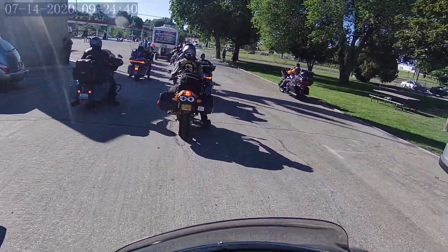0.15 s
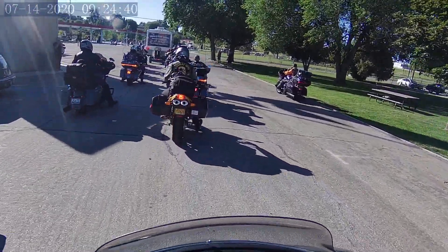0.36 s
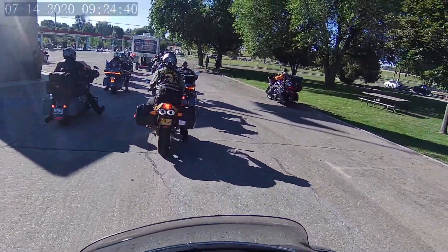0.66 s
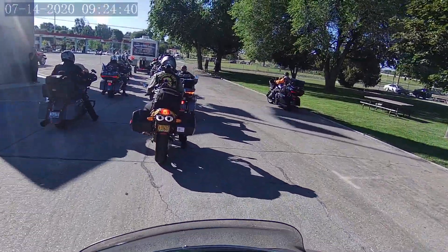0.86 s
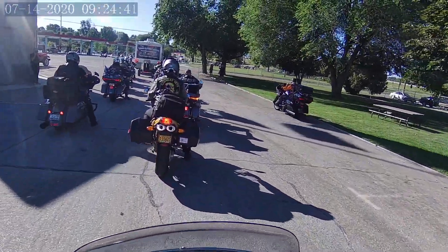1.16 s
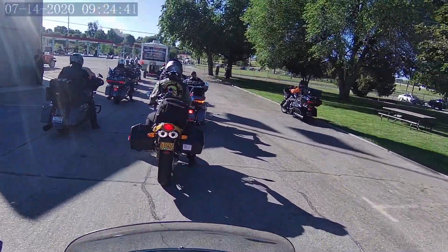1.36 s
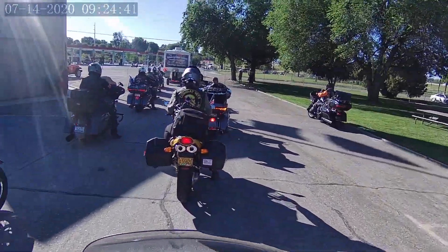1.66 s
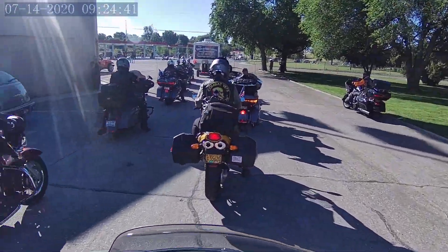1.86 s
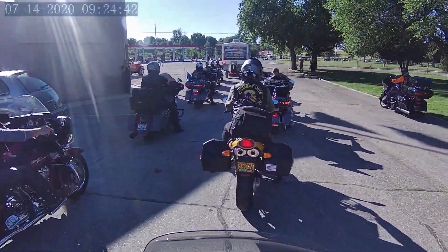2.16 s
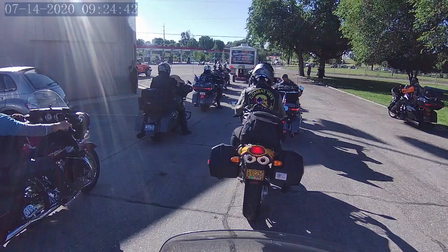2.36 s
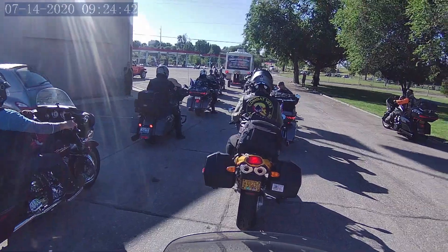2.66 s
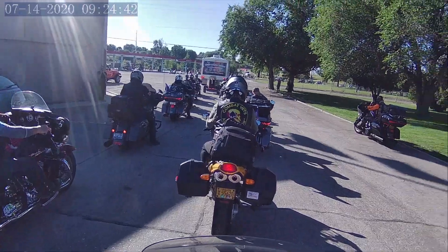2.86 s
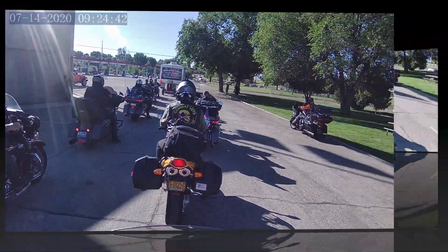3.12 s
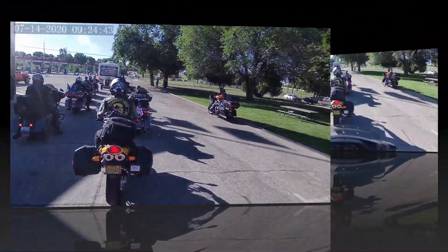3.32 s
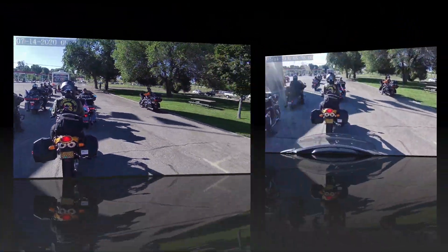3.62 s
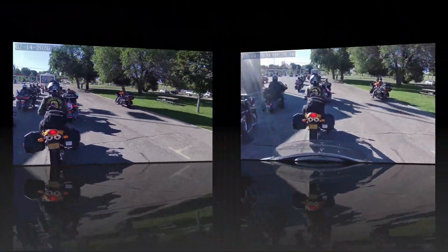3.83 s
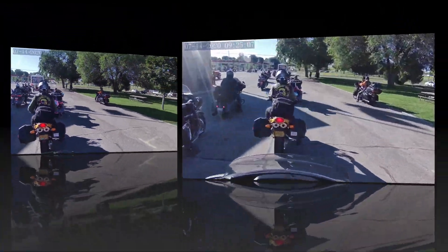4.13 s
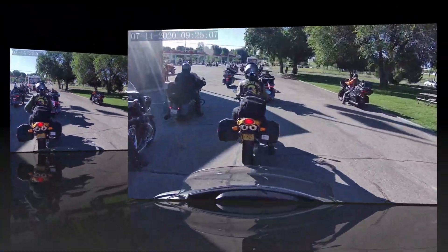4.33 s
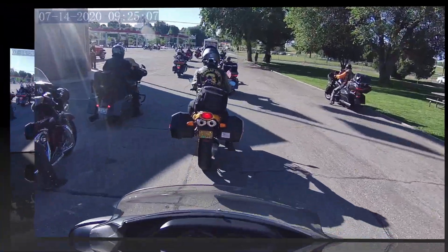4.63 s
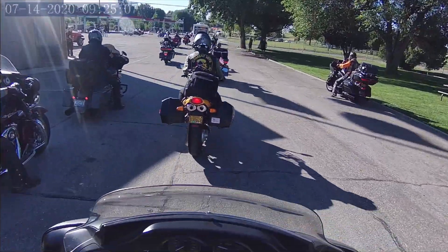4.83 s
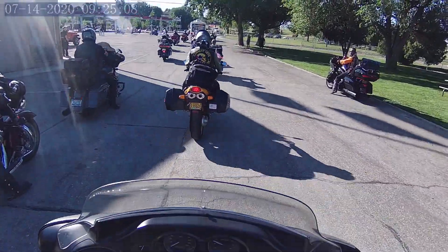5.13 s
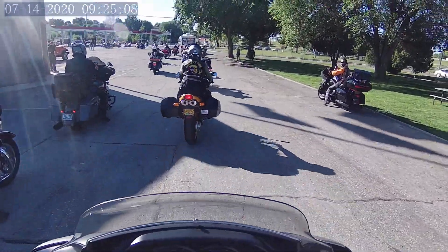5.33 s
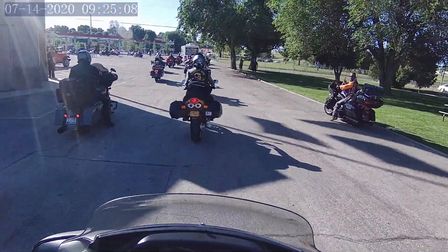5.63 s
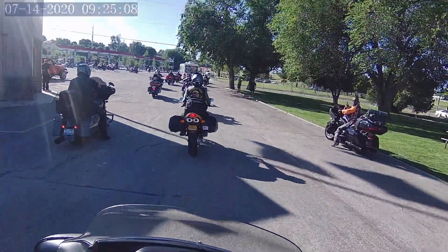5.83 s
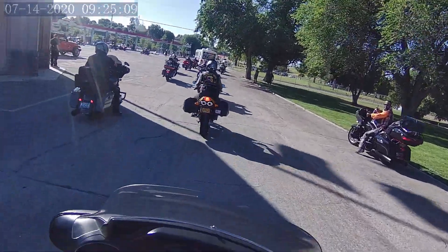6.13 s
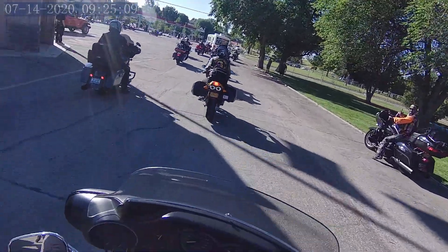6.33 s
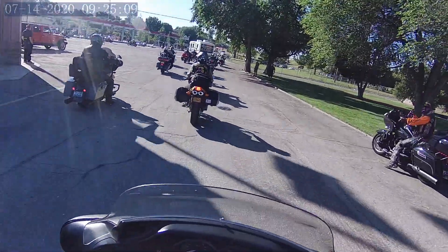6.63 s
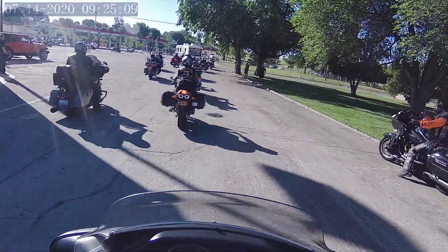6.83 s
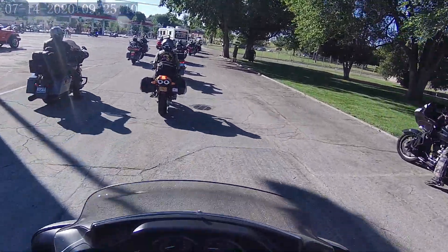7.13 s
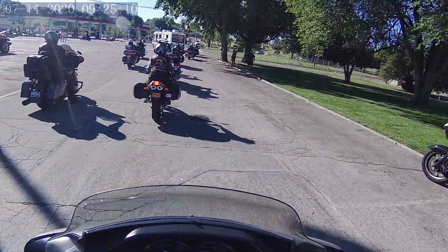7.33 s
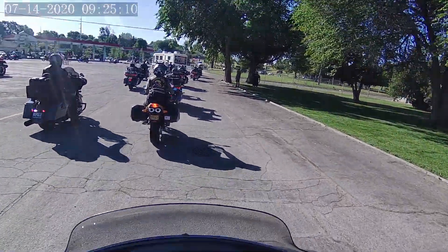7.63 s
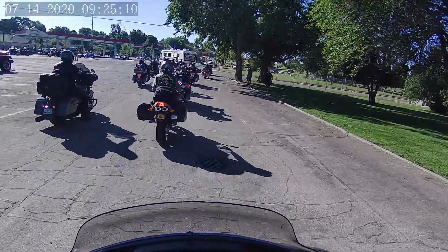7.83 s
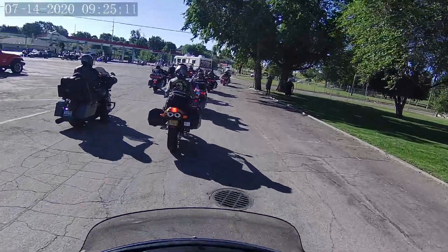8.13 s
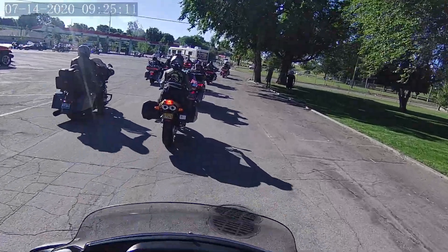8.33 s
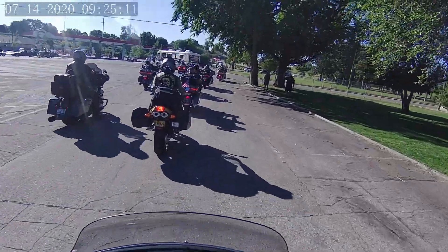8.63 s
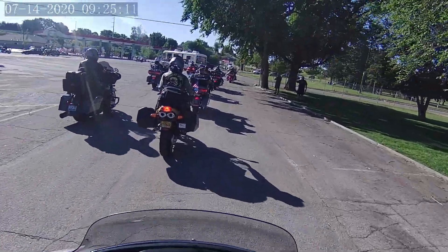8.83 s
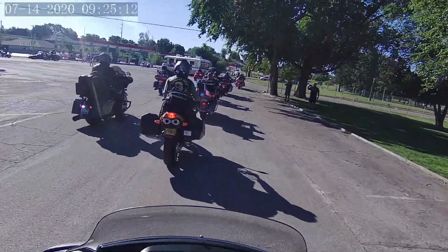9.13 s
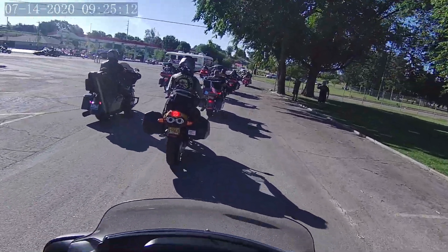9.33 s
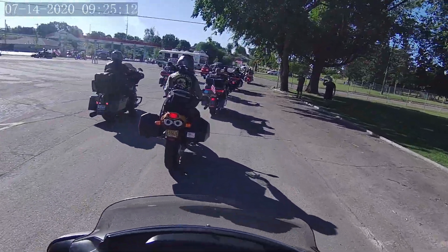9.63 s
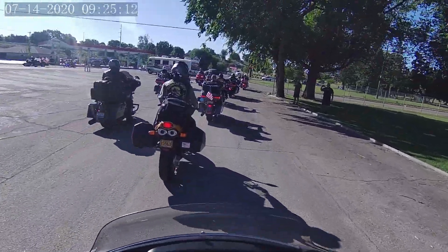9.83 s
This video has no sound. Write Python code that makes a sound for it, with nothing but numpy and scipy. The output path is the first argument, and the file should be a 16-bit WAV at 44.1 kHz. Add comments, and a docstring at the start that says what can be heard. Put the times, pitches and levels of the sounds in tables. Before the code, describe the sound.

A group of V-twin motorcycles idles outdoors in a parking lot, heard from one of the bikes: a low, uneven rumble with light valve ticks. The nearest throttle is blipped several times, barking and popping, while other bikes drone and the whole pack grows much louder. The near engine lugs in heavy thumps as it pulls away, the bike jolts over rough paving, and the rumble sinks again.

```python
"""A group of V-twin motorcycles idles in a parking lot, then pulls away, heard from one of the bikes.
At first firings boom in the pipes, valves tick and a waiting bike hums, its idle sagging.
From 3.5 s the near throttle is blipped: pressure fronts bark, gas roars and fittings clang.
From 4.5 s open pipes snap and two other bikes drone. At 6.4 s the near engine lugs in heavy thumps.
Near 8 s the bike jolts over rough paving; its engine knocks and settles as the rumble sinks."""
import sys
import numpy as np
from scipy import signal
from scipy.io import wavfile
from scipy.ndimage import uniform_filter1d

SR = 44100
rng = np.random.default_rng(int(sys.argv[2]) if len(sys.argv) > 2 else 0)


def dump(signal):
    """Clip the signal to [-1, 1] and save it as 16-bit WAV at the path in sys.argv[1]."""
    limited = np.clip(np.atleast_2d(signal).T, -1, 1)
    pcm = np.round(limited * 32767).astype(np.int16)
    wavfile.write(sys.argv[1], SR, pcm)


N = 439677
TIME = np.arange(N) / SR


def amp(db):
    return 10 ** (np.asarray(db) / 20)


def unit(x):
    return x / np.sqrt(np.mean(x ** 2) + 1e-20)


def steady(x, size=6000):
    """Holds the running rms at 1, leaving single beats intact."""
    return x / np.sqrt(uniform_filter1d(uniform_filter1d(x ** 2, size), size) + 1e-12)


def curves(rows):
    """One curve per column after t/s."""
    times_s, *columns = np.transpose(rows)
    return [np.interp(TIME, times_s, column) for column in columns]


def add(mix, at_s, sound):
    part = mix[max(round(at_s * SR), 0):][:len(sound)]
    part += sound[:len(part)]


def wander(rate_hz):
    """Random drift, rms 1."""
    knots_s = np.arange(0, TIME[-1] + 1, 1 / rate_hz)
    return unit(np.interp(TIME, knots_s, rng.standard_normal(2048)[:len(knots_s)]))


def hump(t, peak_s):
    """Rises to 1 at peak_s, then decays."""
    return t / peak_s * np.exp(1 - t / peak_s)


def onset(t, rise_s):
    return 1 - np.exp(-(t / rise_s) ** 2)


def gate(rows, edge_s):
    """Ramps in after the first row, out before the last."""
    return np.clip(np.minimum(TIME - rows[0][0], rows[-1][0] - TIME) / edge_s, 0, 1)


def spell_db(start_s, hold_s, rise_db_per_s, fall_db_per_s):
    """Attack, hold at 0 dB, release."""
    early_s, late_s = np.maximum(start_s - TIME, 0), np.maximum(TIME - start_s - hold_s, 0)
    return -rise_db_per_s * early_s - fall_db_per_s * late_s


def fade(x, tail_s):
    """Exponential tail on every pulse."""
    return signal.lfilter([1], [1, -np.exp(-1 / (tail_s * SR))], x)


def colour(x, spectrum, size=8192):
    """Minimum-phase filter from rows of f/Hz, level/dB."""
    hz, db = np.transpose(spectrum)
    bins_hz = abs(np.fft.fftfreq(size, 1 / SR)) + 1
    log_gain = np.log(amp(np.interp(np.log(bins_hz), np.log(hz), db)))
    taps = np.fft.ifft(np.exp(np.conj(signal.hilbert(log_gain)))).real[:size // 2]
    return signal.oaconvolve(x, taps)[:len(x)]


def burst(envelope, spectrum, ripple_db=4):
    """Noise puff ringing resonances in random proportions; strongest rms 1."""
    varied = [(hz, db + ripple_db * rng.standard_normal()) for hz, db in spectrum]
    puff = colour(envelope * rng.standard_normal(len(envelope)), varied, size=2048)
    return puff / np.sqrt(uniform_filter1d(puff ** 2, size=110).max())


def turbulence(depth_db):
    """Noise in which patches about 10 ms by 700 Hz come and go."""
    bins = signal.stft(rng.standard_normal(N), nperseg=256)[2]
    patches = uniform_filter1d(rng.standard_normal(bins.shape), size=4, axis=0)
    patches = uniform_filter1d(patches, size=4, axis=1)
    return signal.istft(bins * amp(depth_db * unit(patches)))[1][:N]


def reflections(x, span_s, wet_db, count=24):
    """Scattered echoes off ground, wall and other bikes."""
    delay, sign = rng.uniform(.04, 1, count), rng.choice([-1, 1], count)
    taps = np.zeros(SR // 2)
    taps[(delay * span_s * SR).astype(int)] = sign * np.exp(-2 * delay)
    return x + amp(wet_db) * signal.oaconvolve(x, taps / np.linalg.norm(taps))[:N]


def strokes(cycles, uneven_db, rear_db):
    """A 45-degree V-twin fires twice a cycle, 315 and 405 degrees apart, never twice alike."""
    out = np.zeros(N)
    for lag, db in ((0, 0), (315 / 720, rear_db)):
        at = np.flatnonzero(np.diff(np.floor(cycles - lag)))
        out[at] = amp(db + uneven_db * rng.standard_normal(512)[:len(at)].clip(-2, 2))
    return out


def pack_firings(cycle_hz, uneven_db, jitter=0.008085):
    """Another bike's firings: random crank phase, slightly unsteady speed."""
    cycles = np.cumsum(cycle_hz * (1 + jitter * wander(12))) / SR + rng.random()
    return strokes(cycles, uneven_db, rear_db=-2)


# other engines, idle cycle rates: f/Hz
PACK_IDLE_HZ = [12.6, 14.8, 16.3, 19.1]
# chain and tappet spectrum: f/Hz, level/dB
CHATTER_SPECTRUM = [(400, -12.5), (700, 1.5), (950, 8), (1350, 3.5), (1700, -4.5), (2100, -6.5),
                    (2600, -24), (3000, -16), (3450, -22.5), (4000, -10), (4500, -6), (5200, -17.5),
                    (6200, -19.5), (7300, -31), (9000, -20.5), (11000, -45.5)]
def chatter(level_db=-71):
    """Chains and tappets of the other engines clatter unevenly."""
    beats = sum(pack_firings(hz, uneven_db=3, jitter=0.027) for hz in PACK_IDLE_HZ)
    clatter = fade(beats, tail_s=.004) * turbulence(depth_db=4.5)
    return amp(level_db) * unit(colour(clatter, CHATTER_SPECTRUM))


# gear tone: t/s, f/Hz, level/dB
GEAR_TONE = [(.9, 675, -61), (1.15, 695, -63.5), (1.45, 710, -62.5), (1.819, 699, -64)]
def gear_whine(flutter=0.0085, waver_db=3):
    """Gears of an idling bike give a thin, nearly pure tone."""
    hz, db = curves(GEAR_TONE)
    gain = gate(GEAR_TONE, edge_s=.08) * amp(db + waver_db * wander(25))
    cycles = np.cumsum(hz * (1 + flutter * wander(59.7))) / SR
    return gain * np.sin(2 * np.pi * cycles)


# hollow whines: t/s, hold/s, level/dB
AIR_WHINES = [(7.02, 0.13, -51.5), (7.806, 0.062, -46.5), (8.32, 0.065, -59)]
# air resonance: f/Hz, level/dB
WHINE_SPECTRUM = [(300, -43), (560, -8), (680, -3.5), (820, -16.5), (1800, -55.5), (6000, -110)]
def air_whine(rise_db_per_s=120, fall_db_per_s=60):
    """Moving air sings in one narrow resonance."""
    spells = [db + spell_db(at_s, hold_s, rise_db_per_s, fall_db_per_s)
              for at_s, hold_s, db in AIR_WHINES]
    return amp(np.max(spells, 0)) * steady(colour(rng.standard_normal(N), WHINE_SPECTRUM))


# sagging idle: t/s, cycle rate/Hz, level/dB
WAITING_IDLE = [(0, 14.05, -40), (.55, 13.9, -42.5), (1.15, 14.15, -43), (1.75, 13.95, -41.5),
                (2.0, 13.3, -42.5), (2.25, 12.4, -42), (2.6, 11.8, -40.5), (3.0, 11.0, -44.5),
                (3.4, 10.6, -42), (3.8, 10.6, -53)]
# exhaust orders: f/cycle rate, level/dB
HUM_ORDERS = [(8, -8), (9, -6.5), (10, -2), (11, -7.5), (12, -1.5), (13, -3), (14, -7.5), (15, 0),
              (16, -10), (18, -7.5), (21, -21.5)]
def waiting_bike(waver_db=2, jitter=0.0038, release_s=0.23):
    """An even idle: exhaust orders stand out as a hum that sinks with the revs."""
    cycle_hz, db = curves(WAITING_IDLE)
    cycles = np.cumsum(cycle_hz * (1 + jitter * wander(18))) / SR
    hum = sum(amp(order_db + waver_db * wander(13)) * np.sin(2 * np.pi * (order * cycles + rng.random()))
              for order, order_db in HUM_ORDERS)
    return amp(db) * np.clip((WAITING_IDLE[-1][0] - TIME) / release_s, 0, 1) * hum


# bike taking up speed, strongest order: t/s, f/Hz, level/dB
LOW_DRONE = [(4.5, 135, -23), (4.62, 126, -16.5), (4.77, 126, -21.5), (4.9, 136, -17), (5.13, 127.5, -15.5),
             (5.35, 125.5, -18.5), (5.85, 124, -15.5), (6.15, 114, -16.5), (6.23, 113, -24.5),
             (6.5, 108, -17.5)]
# higher-revving bike easing off: t/s, f/Hz, level/dB
HIGH_DRONE = [(5.05, 177, -27), (5.3, 176.7, -35), (5.45, 176.6, -20.5), (5.8, 175.8, -18.5),
              (5.95, 165.9, -31.5), (6.1, 159, -55), (6.2, 157, -49)]
# exhaust orders: f/strongest order, level/dB
DRONE_PARTIALS = [(.5, -23), (1, -0.5), (1.5, -9.5), (2, -16), (2.5, -24), (3, -22)]
def drone(rows, side_orders_db=0, lumpy_db=1.5, gain_db=-1):
    """Near-steady revs: exhaust orders form a low note, the strongest wavering least."""
    hz, db = curves(rows)
    cycles = np.cumsum(hz * (1 + 0.0045 * wander(30))) / SR
    note = np.zeros(N)
    for ratio, order_db in DRONE_PARTIALS:
        offset_db = (side_orders_db + 3 * wander(9.9)) * (ratio != 1) + lumpy_db * wander(40)
        note += amp(order_db + offset_db) * np.sin(2 * np.pi * (ratio * cycles + rng.random()))
    return amp(db + gain_db) * gate(rows, edge_s=0.054) * note


# group pulling away, easing off: t/s, boom level/dB, rasp level/dB
EXHAUST_LEVELS = [(0, -39, -53), (1.9, -38.5, -53), (2.9, -40.5, -56), (3.35, -37.5, -49.5),
                  (4.1, -25, -40), (4.4, -22.5, -39.5), (4.85, -20.5, -36.5), (6.25, -22.5, -38.5),
                  (6.42, -28, -42.5), (6.75, -26, -41), (7.3, -28, -47), (7.68, -27, -34), (7.76, -35, -49),
                  (7.95, -28, -53), (8.15, -33, -48.5), (9.1, -36.5, -52.5), (9.97, -37.5, -54)]
# pipe boom at idle, under load, throttles shut: f/Hz, level/dB
IDLE_SPECTRUM = [(20, -54), (35, -35.5), (52, -6.5), (80, -13), (100, -3), (120, 1), (150, 0), (205, -6),
                 (255, -12.5), (330, -20.5), (480, -43), (900, -56.5), (3000, -110)]
LOAD_SPECTRUM = [(20, -38.5), (36, -33), (52, -15), (75, -8), (100, -1), (130, 1.5), (160, 4.5), (200, -2),
                 (250, -6.5), (330, -13.5), (480, -22.5), (900, -65.5), (3000, -110)]
COAST_SPECTRUM = [(20, -48), (35, -30), (55, -10.5), (80, -9.5), (108, 0.5), (135, 1), (170, -5), (208, -3),
                  (255, -18), (330, -24), (480, -42.5), (900, -59.5), (3000, -110)]
# gas puffs: f/Hz, level/dB
RASP_SPECTRUM = [(100, -44.5), (245, -2.5), (300, 9), (360, 2.5), (430, 1.5), (560, 0.5), (700, -3.5),
                 (790, -10.5), (950, -7.5), (1150, -26.5), (1500, -30), (2100, -38.5), (2700, -47),
                 (10000, -82.5)]
def exhausts(near_firings, clap_db, blip_rasp_db=-6, coast_from_s=6.7, coast_over_s=.4):
    """All firings boom in their pipes and drag puffs of turbulent gas along, more on each blip."""
    boom_db, rasp_db = curves(EXHAUST_LEVELS)
    load = np.clip((boom_db + 37) / 15, 0, 1)
    coast = np.clip((TIME - coast_from_s) / coast_over_s, 0, 1)
    revs = 1 + .35 * uniform_filter1d(load, SR // 2)
    others = [pack_firings(hz * revs * (1 + .015 * wander(1.5)), uneven_db=0.5) for hz in PACK_IDLE_HZ]
    pack = unit(sum(reflections(bike, span_s=.06, wet_db=-1.5) for bike in others))
    pulses = unit(reflections(near_firings, span_s=.03, wet_db=2)) + amp(6.5) * pack
    idling = steady(colour(pulses, IDLE_SPECTRUM))
    loaded = steady(colour(pulses, LOAD_SPECTRUM))
    coasting = steady(colour(pulses, COAST_SPECTRUM))
    boom = (1 - coast) * ((1 - load) * idling + load * loaded) + coast * coasting
    puffs = (.2 + fade(near_firings + amp(-6.5) * sum(others), tail_s=0.019)) * rng.standard_normal(N)
    rasp = steady(colour(unit(puffs) + amp(-7) * pulses, RASP_SPECTRUM), size=3500)
    rasp_gain = np.hypot(amp(rasp_db), amp(clap_db + blip_rasp_db))
    return amp(boom_db) * steady(boom, size=2500) + rasp_gain * rasp


# near engine lugging: t/s, hold/s, effort/dB
LUG_SPELLS = [(2.88, 0.078, -30), (3.855, 0.13, -25.5), (6.415, 1, -6.5)]
def chug(cycles, heave_db=2, peak_phase=0.096, surge_db=0.55, lug_surge_db=2.5, full_lug_db=-12):
    """Rumble gain: random surges, plus one heave a cycle while the near engine lugs."""
    efforts_db = [db + spell_db(at_s, hold_s, rise_db_per_s=78, fall_db_per_s=10.5)
                  for at_s, hold_s, db in LUG_SPELLS]
    lug = np.clip(amp(np.max(efforts_db, 0) - full_lug_db), 0, 1)
    heave = lug * np.cos(2 * np.pi * (cycles - peak_phase))
    return amp(heave_db * heave + (surge_db + lug_surge_db * lug) * wander(15))


# gas hiss apart from blips: t/s, level/dB
FLOW_LEVELS = [(0, -76.5), (1, -78.5), (3.05, -74), (3.6, -55.5), (4.1, -61), (4.52, -53), (4.62, -66),
               (4.85, -69.5), (5.12, -73.5), (5.5, -67), (7.2, -68.5), (8.4, -71.5), (9.97, -74.5)]
# gas hiss spectrum: f/Hz, level/dB
HISS_SPECTRUM = [(400, -24.5), (1000, 12), (1450, 5.5), (1950, 5), (2350, 0), (2650, -22), (3050, -7.5),
                 (3400, -14.5), (3900, -1), (4500, 2.5), (5300, -7.5), (6200, -6.5), (7300, -23.5),
                 (8900, -10.5), (11000, -32.5)]
def gas_hiss(near_firings, flow_db, grit_db=3):
    """Moving gas: smooth at idle; gritty, patchy and throbbing with the engine as flow grows."""
    flow = np.clip((flow_db + 76) / 16, 0, 1)
    throb = 1 + 0.9 * flow * fade(near_firings, tail_s=0.049)
    grit = amp(grit_db * flow * wander(150))
    gas = (1 - flow) * rng.standard_normal(N) + flow * turbulence(depth_db=3.5)
    return amp(flow_db) * steady(colour(throb * grit * gas, HISS_SPECTRUM))


# sharp pings in the valve clatter: t/s, level/dB, f/Hz
VALVE_PINGS = [(0.109, -63, 2970), (0.2972, -60, 4640), (0.3247, -62, 4700), (0.514, -59, 4600),
               (0.585, -62, 5000), (0.7312, -74, 2720), (0.802, -78, 2750), (1.0854, -75, 4520),
               (1.1119, -72, 3050), (1.2301, -66, 4330), (1.3014, -61, 2930), (1.6587, -56, 4540),
               (1.731, -50, 4600), (1.802, -61, 3000), (1.8287, -60, 4100), (1.8756, -56, 2940),
               (1.9745, -61, 2980), (2.0216, -58, 3020), (2.1246, -65, 2970), (2.173, -58, 4210),
               (2.249, -56, 4400), (2.4307, -59, 3200), (2.4823, -62, 4300), (2.5605, -46, 4190),
               (2.6668, -62, 3080), (2.7207, -62, 4300), (2.803, -56, 4600), (2.83, -58, 4300),
               (2.884, -54, 3030), (3.0525, -61, 4420), (3.089, -57, 3620), (3.1393, -59, 2970),
               (3.225, -49, 4540), (3.31, -51, 4400), (3.351, -52, 3870), (3.3973, -49, 4250),
               (6.9666, -53, 3840), (7.333, -50, 4020), (8.776, -53, 4130), (9.0342, -57, 4120),
               (9.2976, -60, 3850), (9.665, -48, 4180), (9.855, -55.5, 4100), (9.95, -50, 4160)]
# valve gear modes: f/Hz, level/dB, t60/s
VALVE_RING = [(3000, -2, 0.015), (3890, -1.5, 0.012), (4270, 1, 0.015), (4620, -9, 0.041),
              (5600, -10, 0.031), (8660, -10.5, 0.027), (9600, -12.5, .04)]
def valves(cycles, flow_db, ping_gain_db=1, main_db=12, main_t60_s=0.022, spread=0.033, off_pitch_db=-9):
    """Valves snap shut twice a cycle, harder with more flow; each rings the cylinder head anew."""
    beats = strokes(cycles, uneven_db=3.5, rear_db=-5) * amp(-64 + 0.8 * (flow_db + 71))
    hz, db, t60_s = np.transpose(VALVE_RING)[:, :, None]
    ticks = [(i / SR, beats[i], rng.choice(hz[:4, 0]) * (1 + spread * rng.standard_normal()))
             for i in np.flatnonzero(beats)]
    pings = [(at_s, amp(ping_db + ping_gain_db), pitch_hz) for at_s, ping_db, pitch_hz in VALVE_PINGS]
    out, t = np.zeros(N), np.arange(SR // 25) / SR
    for at_s, peak, pitch_hz in pings + ticks:
        detune, strength, phase = rng.standard_normal((3, 3, len(hz), 1))  # three tones per mode
        off_pitch = np.minimum(abs(np.log2(hz / pitch_hz)) * 4, 1)
        envelopes = amp(db + 5 * strength[0] + off_pitch_db * off_pitch - 60 * t / t60_s)
        modes = envelopes * np.sin(2 * np.pi * (hz * (1 + spread * detune) * t + phase))
        main = amp(main_db - 60 * t / main_t60_s) * np.sin(2 * np.pi * pitch_hz * t)
        ring = (modes.sum((0, 1)) + main) * onset(t, rise_s=0.0014)
        add(out, at_s, peak * ring / abs(ring).max())
    return out


# light chinks, hard clangs: t/s, level/dB, f/Hz
FITTING_CHINKS = [(0.084, -65, 8700), (0.5856, -64, 9380), (0.8021, -59.5, 8980), (1.3004, -63, 9000),
                  (1.4426, -67, 9300), (1.515, -68, 9300), (1.5469, -64, 8840), (1.5868, -60, 9300),
                  (1.659, -64, 9350), (1.731, -65, 9500), (2.3266, -64, 8600), (2.4823, -58, 8800),
                  (2.8848, -59, 9370), (3.1762, -59, 9430), (3.3493, -53, 9620), (3.399, -59, 8500),
                  (3.438, -53, 9600), (7.174, -59.5, 8900), (7.219, -65, 8760), (7.3325, -51, 8840),
                  (8.6862, -67, 9250), (9.1222, -71, 8700), (9.2988, -69, 8700), (9.389, -61, 8800),
                  (9.5721, -61.5, 8700), (9.7607, -57.5, 9000)]
FITTING_CLANGS = [(4.232, -38, 1920), (5.302, -29.5, 1456), (6.1, -20, 1160), (6.299, -23.5, 1400),
                  (6.357, -42, 1350), (6.638, -39, 1860), (6.774, -36, 1940), (7.439, -29.5, 1490),
                  (7.532, -35.5, 4370), (7.569, -41.5, 2550), (7.613, -39, 1790), (7.687, -33.5, 1530)]
def loose_fittings(rows, gain_db, ring_s, spread):
    """Shaken parts ring briefly, each in a close cluster of four tones."""
    out, t = np.zeros(N), np.arange(SR // 20) / SR
    for at_s, db, hz in rows:
        detune, phase = rng.standard_normal((2, 4, 1))
        cluster = np.sin(2 * np.pi * (hz * (1 + spread * detune) * t + phase)).sum(0)
        ring = cluster * t * np.exp(-t / ring_s)
        add(out, at_s, amp(db + gain_db) * ring / abs(ring).max())
    return out


# brief rattles: t/s, swell/s, level/dB
RATTLE_BURSTS = [(3.838, 0.0069, -52), (3.951, 0.0077, -57.5), (4.645, .009, -57.5), (4.68, 0.0073, -57)]
# click spectrum: f/Hz, level/dB
RATTLE_SPECTRUM = [(2800, -35), (3600, -4.5), (4500, 5), (5900, -11), (7000, -17), (9000, -16),
                   (11000, -38)]
def rattles(grain_db=4):
    """Something loose buzzes in a spray of tiny bright clicks."""
    out, t = np.zeros(N), np.arange(SR // 8) / SR
    for at_s, swell_s, db in RATTLE_BURSTS:
        grains = amp(grain_db * np.repeat(rng.standard_normal(len(t)), 64)[:len(t)])
        add(out, at_s, amp(db) * burst(grains * hump(t, swell_s), RATTLE_SPECTRUM, ripple_db=7))
    return out


# rough paving and a drain: t/s, swell/s, level/dB
BUMPS = [(7.625, 0.022, -28), (7.848, 0.012, -30.5), (7.885, 0.013, -31.5), (8.322, 0.02, -34),
         (8.425, 0.011, -42.5), (8.503, 0.0053, -37.5)]
# bodywork response: f/Hz, level/dB
BODYWORK_SPECTRUM = [(90, -28.5), (200, -2.5), (300, 5.5), (400, -0.5), (560, -2.5), (760, -9), (900, -17),
                     (1200, -30), (3000, -49), (8000, -88)]
def jolts():
    """Each bump shakes the bodywork into a short hollow rumble."""
    out, t = np.zeros(N), np.arange(SR // 6) / SR
    for at_s, swell_s, db in BUMPS:
        add(out, at_s, amp(db) * burst(hump(t, swell_s), BODYWORK_SPECTRUM, ripple_db=1))
    return out


# knocks of the settling engine: t/s, level/dB
CASING_KNOCKS = [(7.768, -52), (7.8535, -47), (7.9476, -53.5), (8.0403, -57), (8.1353, -55),
                 (8.2306, -58.5), (8.3217, -52), (8.4143, -55), (8.5075, -54.5), (8.687, -62),
                 (8.8613, -61)]
# casing response: f/Hz, level/dB
CASING_SPECTRUM = [(200, -11.5), (500, 15.5), (1100, -12), (1650, 3.5), (2250, 2), (2700, -17.5),
                   (3400, -20.5), (3950, 9.5), (4300, 4), (4700, -5.5), (5100, -25), (5700, -13),
                   (7000, -36), (9400, -7), (11000, -43.5)]
def knocks(gain_db=-3, swell_s=0.0035):
    """As the revs drop back, the engine casing clacks about once a cycle."""
    out, t = np.zeros(N), np.arange(SR // 20) / SR
    for at_s, db in CASING_KNOCKS:
        add(out, at_s, amp(db + gain_db) * burst(hump(t, swell_s), CASING_SPECTRUM, ripple_db=1.5))
    return out


# gas tearing out of the pipes: f/Hz, level/dB
ROAR_SPECTRUM = [(150, -20), (330, 14.5), (480, 10.5), (700, 3.5), (1000, 2), (1350, -11), (2100, -15.5),
                 (2700, -28), (5000, -39), (10000, -69)]
def roar(near_firings, clap_db, gain_db=-9):
    """On an open throttle, turbulent gas fills the gaps between barks."""
    gas = (0.31 + fade(near_firings, tail_s=0.02)) * turbulence(depth_db=6)
    return amp(clap_db + gain_db) * steady(colour(gas, ROAR_SPECTRUM), size=3000)


# hard firings of a bike pulling away: t/s, level/dB
PIPE_SNAPS = [(4.57, -20.5), (4.602, -18), (4.639, -17), (4.677, -30), (4.697, -22), (4.717, -20),
              (4.744, -24), (4.766, -22.5), (4.7894, -16), (4.807, -21), (4.8295, -19.5), (4.847, -18),
              (4.866, -30.5), (4.882, -19.5), (4.919, -27), (4.94, -17.5), (4.955, -28), (4.976, -24.5),
              (4.993, -24.5), (5.051, -25.5), (5.094, -23), (5.11, -29)]
# open pipe response: f/Hz, level/dB
SNAP_SPECTRUM = [(60, 6), (150, 12.5), (450, 13.5), (800, 9.5), (1500, -5), (2200, -3.5), (3000, -18.5),
                 (4000, -24.5), (6000, -25.5), (12000, -43.5)]
def snaps(push_db=2, push_s=0.0012, puff_db=-21, puff_s=0.0016):
    """A hard firing leaves the pipe as a steep push, then suction and a spit of gas."""
    out, t = np.zeros(N), np.arange(SR // 30) / SR
    for at_s, db in PIPE_SNAPS:
        age = t / (push_s * np.exp(0.077 * rng.standard_normal()))
        pressure = onset(t, rise_s=.0004) * (1 - age) * np.exp(-age)
        push = colour(pressure, SNAP_SPECTRUM, size=2048)
        puff = burst(hump(t, puff_s) ** 2, SNAP_SPECTRUM)
        add(out, at_s, amp(db) * (amp(push_db) * push / abs(push).max() + amp(puff_db) * puff))
    return out


# heavy firings, at their peaks: t/s, level/dB, f/Hz, swell/s
HEAVY_FIRINGS = [(2.891, -31, 136, .014), (2.974, -31, 141, 0.013), (3.42, -28, 133, 0.015),
                 (3.817, -20, 132, 0.0097), (3.929, -21, 152, 0.0085), (3.977, -21.5, 146, 0.01),
                 (4.047, -20.5, 145, 0.021), (4.136, -18, 142.6, 0.021), (4.21, -19, 138, .012),
                 (4.384, -17, 136, .009), (4.457, -16.5, 141, .009), (6.386, -17.5, 140, .011),
                 (6.452, -18.5, 144, 0.016), (6.48, -16, 127, 0.015), (6.522, -14.5, 137, 0.017),
                 (6.705, -12.5, 145, 0.01), (6.787, -16.5, 146, 0.0095), (6.856, -23.5, 122, 0.023),
                 (6.883, -19, 168, 0.0098), (6.925, -15.5, 132, 0.024), (6.967, -18, 145.6, 0.013),
                 (7.03, -16.5, 154, 0.011), (7.08, -20.5, 139, .011), (7.134, -17, 128, 0.021),
                 (7.178, -17, 144, 0.011), (7.244, -15, 136.6, 0.021), (7.336, -19, 133, 0.0097),
                 (7.358, -17.5, 130, 0.011), (7.452, -16, 131, 0.016), (7.551, -19, 125.4, 0.014),
                 (7.568, -16.5, 150, 0.0071), (7.693, -17.5, 150.6, 0.017), (7.722, -16, 175, 0.0089),
                 (7.869, -22, 143.4, 0.029), (7.971, -18, 136, 0.011), (8.023, -24, 130, 0.014),
                 (8.066, -22, 141, 0.011), (8.26, -22, 130, 0.011), (8.473, -27.5, 143, 0.0062),
                 (8.511, -28.5, 150, 0.012), (8.554, -22.5, 132, 0.0083), (8.666, -26, 147, 0.006),
                 (9.163, -27.5, 145, 0.0059)]
# pipe resonances: f/firing pitch, level/dB
PIPE_MODES = [(0.602, -9), (0.999, 4), (1.45, -10.5), (2.299, -17)]
def thumps(ring_db=-1.5, puff_db=-24, spread=0.087):
    """A heavy firing swells in the pipe resonances with a puff of gas and dies quickly."""
    out, t = np.zeros(N), np.arange(SR // 10) / SR
    ratio, mode_db = np.transpose(PIPE_MODES)[:, :, None]
    for peak_s, db, hz, swell_s in HEAVY_FIRINGS:
        mode_hz = hz * ratio * (1 + spread * rng.uniform(-1, 1, ratio.shape))
        swell = hump(t, swell_s) ** 3
        ring = swell * (amp(mode_db) * np.cos(2 * np.pi * mode_hz * (t - swell_s))).sum(0)
        puff = burst(swell, RASP_SPECTRUM)
        add(out, peak_s - swell_s, amp(db) * (amp(puff_db) * puff - amp(ring_db) * ring))
    return out


# near throttle blips: t/s, hold/s, crack level/dB, clap level/dB, hiss level/dB
THROTTLE_BLIPS = [(3.517, 0.026, -56, -39, -52.5), (4.225, 0.063, -50, -29.5, -46),
                  (4.369, 0.18, -53, -57, -52), (4.585, 0.1, -64, -39.5, -69),
                  (5.261, 0.085, -43.5, -30, -52.5), (5.516, 0.28, -48.5, -32.5, -64.5),
                  (6.078, 0.24, -43.5, -29, -52), (6.643, 0.04, -46.5, -25, -47),
                  (7.45, 0.27, -59, -45.5, -75.5)]
def throttle():
    """Crack, clap and hiss levels as the throttle opens, holds and shuts."""
    levels_db = np.full((3, N), -120.)
    for at_s, hold_s, *top_db in THROTTLE_BLIPS:
        opening_db = spell_db(at_s, hold_s, rise_db_per_s=184.5, fall_db_per_s=200)
        levels_db = np.maximum(levels_db, np.array(top_db)[:, None] + opening_db)
    return levels_db


# firings that pop hard: t/s, crack level/dB, clap level/dB
HARD_POPS = [(3.4686, -58, -50), (3.534, -43.5, -32.5), (4.165, -61, -36.5), (4.197, -33, -24.5),
             (4.2303, -33, -25), (4.2547, -33, -24.5), (5.177, -49, -34.5), (5.2275, -51, -28),
             (5.2625, -45, -28), (5.3006, -34.5, -25.5), (5.5652, -39, -27), (5.6255, -43.5, -33),
             (5.7452, -44, -29), (6.017, -51, -32.5), (6.0561, -43.5, -27), (6.0995, -42.5, -25.5),
             (6.1317, -38.5, -28.5), (6.1717, -40, -23.5), (6.298, -38.5, -20.5), (6.325, -48, -25.5),
             (6.356, -58, -26.5), (6.5993, -42, -22.5), (6.6372, -37, -24.5), (6.667, -40.5, -22.5),
             (6.7025, -46, -26), (6.7718, -49.5, -30.5), (7.103, -61, -50.5), (7.221, -64, -58),
             (7.4365, -48, -33.5), (7.53, -46, -34), (7.611, -47, -30), (7.6449, -49, -31),
             (7.687, -51, -37)]
# gas jet, mid-range clap and bright crack: f/Hz, level/dB
CLAP_SPECTRUM = [(150, -21), (450, 9), (680, 3.5), (950, 6.5), (1300, -6), (1700, -9), (2150, -10),
                 (2700, -33), (5000, -43.5), (10000, -70.5)]
CRACK_SPECTRUM = [(1000, -22), (2200, -8), (2700, -10), (3050, -6), (3400, -11), (3900, 4.5), (4450, 5),
                  (5100, -5), (5900, -1.5), (7200, -17.5), (8600, -6.5), (11000, -26.5), (15000, -26),
                  (16500, -31.5)]
# modes of pipes and fittings: f/Hz, level/dB, t60/s
METAL_MODES = [(960, -2.5, 0.025), (1460, 5, 0.022), (1900, 1, 0.024), (3020, -13, 0.053),
               (4250, -6.5, 0.049), (4300, -0.5, 0.016), (5900, -15, 0.04), (8350, -17.5, 0.0088)]
def barks(cycles, crack_db, clap_db, pipe_hz=175, ring_s=0.0029, clap_s=0.0034, tail_s=0.0088):
    """Under throttle a firing sends a steep front down the pipe; gas claps and cracks, metal clanks."""
    out, t = np.zeros(N), np.arange(SR // 10) / SR
    front = -onset(t, rise_s=0.0004) * np.exp(-t / ring_s) * np.cos(2 * np.pi * pipe_hz * t + 0.57)
    tail = amp(-23) * np.exp(-t / tail_s)
    crack_envelope = hump(t, peak_s=0.002) ** 2 + tail
    clap_envelope = np.exp(-t / clap_s) + tail
    hz, db, t60_s = np.transpose(METAL_MODES)[:, :, None]
    beats = strokes(cycles, uneven_db=1, rear_db=-1.5)
    pop_s = np.transpose(HARD_POPS)[0]
    pops = [(at_s, *amp(levels_db)) for at_s, *levels_db in HARD_POPS]
    plain = [(i / SR, beats[i] * amp(crack_db[i]), beats[i] * amp(clap_db[i]))
             for i in np.flatnonzero(beats) if abs(pop_s - i / SR).min() > .012]  # pops take their place
    for at_s, crack, clap in pops + plain:
        detune, strength = rng.standard_normal((2, len(hz), 1))
        envelopes = amp(db + 4.8 * strength - 60 * t / t60_s)
        modes = envelopes * np.sin(2 * np.pi * hz * (1 + 0.07 * detune) * t)
        clank = (np.where(hz < 2500, clap * amp(-13), crack * amp(-2)) * modes).sum(0)
        add(out, at_s, clap * amp(19) * front)
        add(out, at_s + .001, clap * amp(-2.5) * burst(clap_envelope, CLAP_SPECTRUM))
        add(out, at_s + .0011, clank * onset(t, rise_s=0.0017))
        add(out, at_s + .0012, crack * amp(-1.5) * burst(crack_envelope, CRACK_SPECTRUM))
    return out


# near engine, four-stroke: t/s, cycle rate/Hz
NEAR_CYCLE_RATE = [(0.0, 13.59), (1.56, 14.14), (3.18, 11.62), (3.97, 12.81), (4.29, 17.94), (4.45, 17.83),
                   (4.83, 11.31), (5.23, 11.53), (5.34, 17.28), (5.42, 14.12), (5.82, 18.11), (5.97, 10.49),
                   (6.32, 17.73), (6.42, 11.33), (6.52, 15.5), (6.85, 14.62), (6.93, 9.73), (7.42, 9.39),
                   (7.64, 13.8), (7.89, 10.38), (9.05, 11.62), (9.97, 10.13)]
def scene():
    """The near bike amid the pack; its crank times the plain barks, soft ticks and chug."""
    cycle_hz, = curves(NEAR_CYCLE_RATE)
    cycles = np.cumsum(cycle_hz) / SR
    crack_db, clap_db, blip_hiss_db = throttle()
    flow_db = np.maximum(curves(FLOW_LEVELS)[0], blip_hiss_db)
    near_firings = strokes(cycles, uneven_db=1, rear_db=0)
    close = reflections(barks(cycles, crack_db, clap_db), span_s=.05, wet_db=-7.5)
    close += thumps() + snaps() + roar(near_firings, clap_db) + jolts() + knocks() + rattles()
    close += loose_fittings(FITTING_CHINKS, gain_db=-1.5, ring_s=0.002, spread=.02)
    close += loose_fittings(FITTING_CLANGS, gain_db=-6.5, ring_s=0.0026, spread=.06)
    notes = waiting_bike() + drone(LOW_DRONE) + drone(HIGH_DRONE, side_orders_db=-7)
    noise_floor = amp(-99) * rng.standard_normal(N)
    rumble = exhausts(near_firings, clap_db) * chug(cycles)
    background = noise_floor + air_whine() + gear_whine() + chatter()
    close += gas_hiss(near_firings, flow_db) + valves(cycles, flow_db)
    return (background + notes + rumble + close)[None]


def record(dry, ceiling=0.98, low_hz=34, high_hz=15900):
    """The microphone rounds the highest peaks and drops the deepest bass; then the band limit."""
    rounded = ceiling * np.tanh(dry / ceiling)
    highpass = signal.butter(3, low_hz, "highpass", fs=SR, output="sos")
    lowpass = signal.firwin(511, high_hz, window=("kaiser", 9), fs=SR)
    return signal.oaconvolve(signal.sosfilt(highpass, rounded), lowpass[None], "same")


dry = scene()
out = record(dry)
dump(out)
```